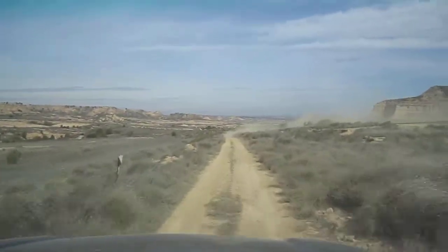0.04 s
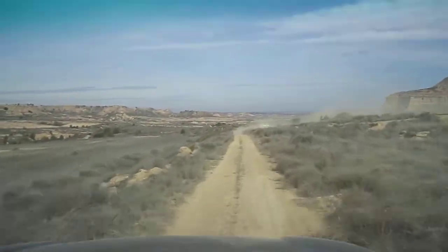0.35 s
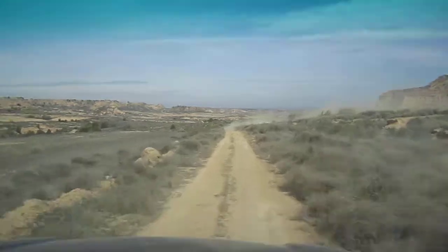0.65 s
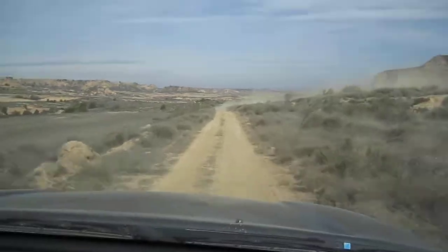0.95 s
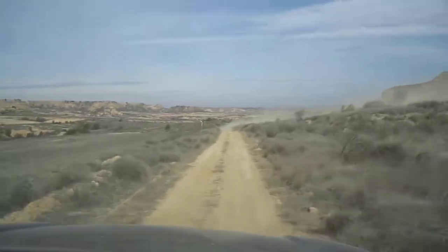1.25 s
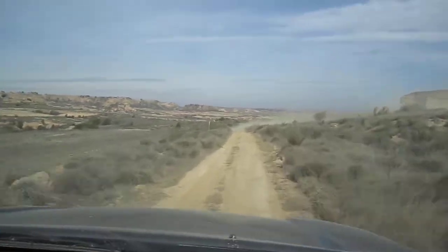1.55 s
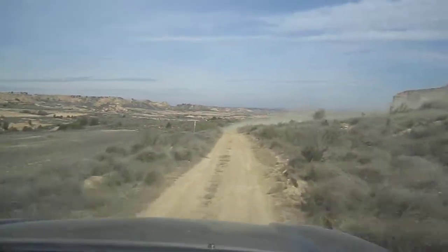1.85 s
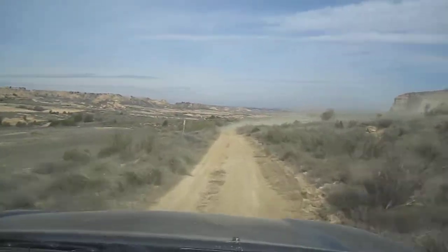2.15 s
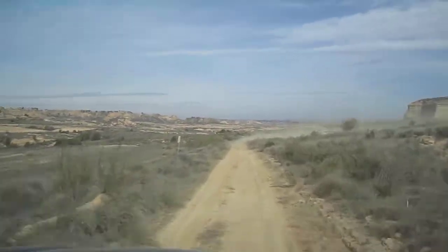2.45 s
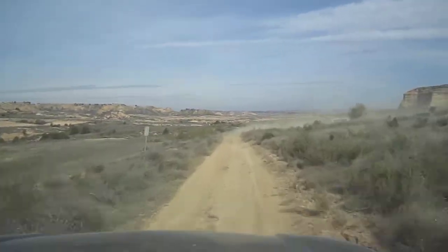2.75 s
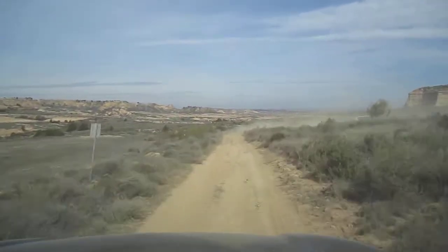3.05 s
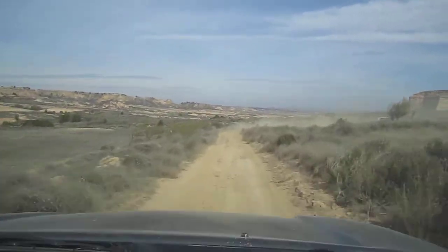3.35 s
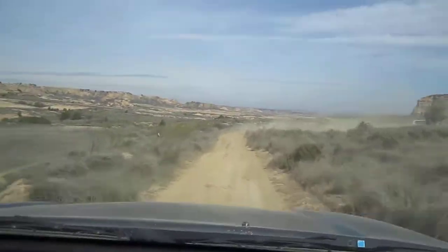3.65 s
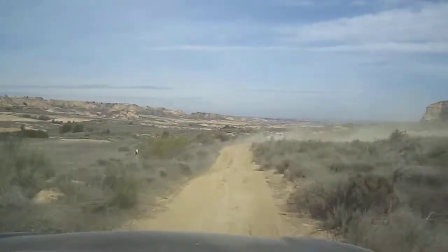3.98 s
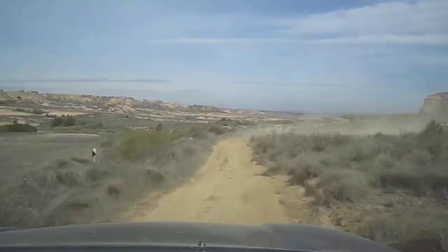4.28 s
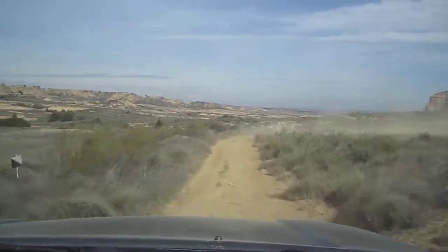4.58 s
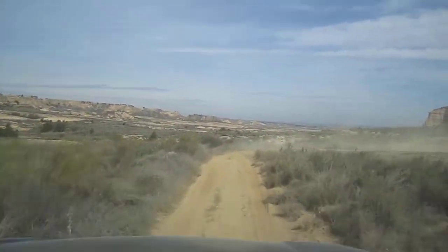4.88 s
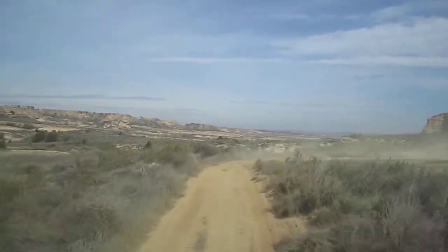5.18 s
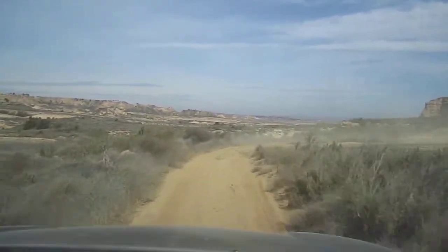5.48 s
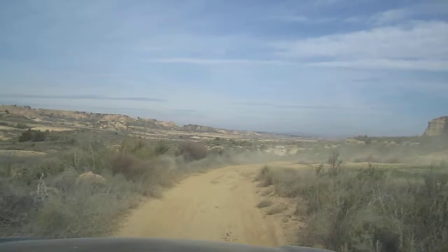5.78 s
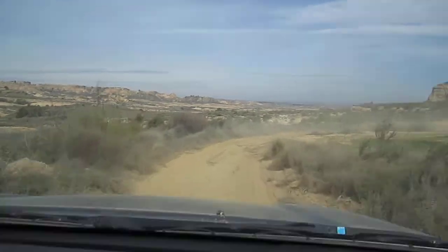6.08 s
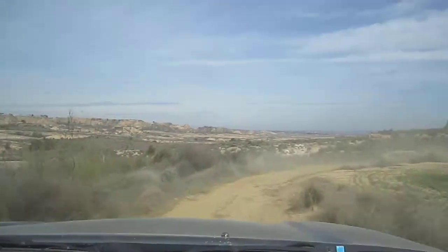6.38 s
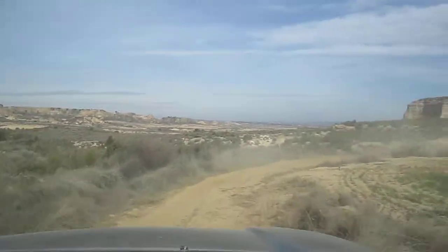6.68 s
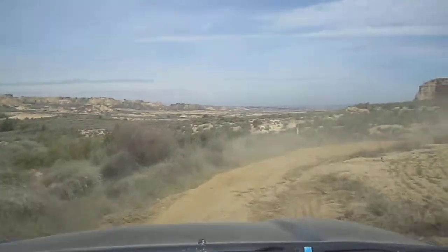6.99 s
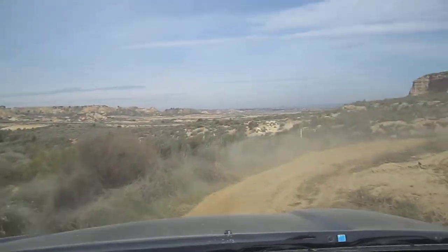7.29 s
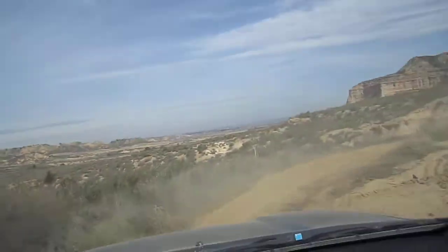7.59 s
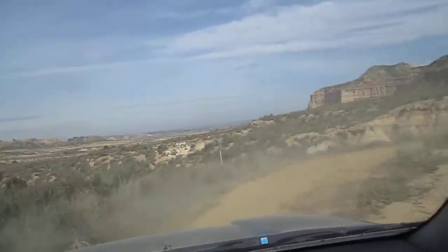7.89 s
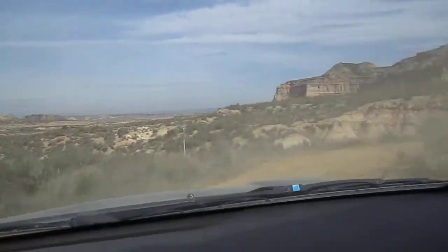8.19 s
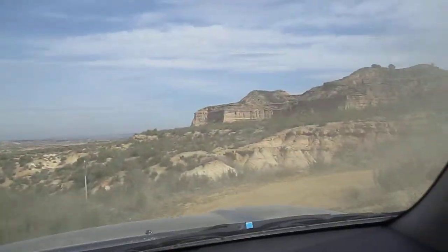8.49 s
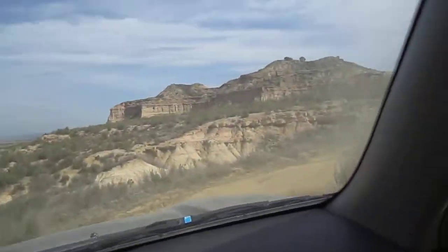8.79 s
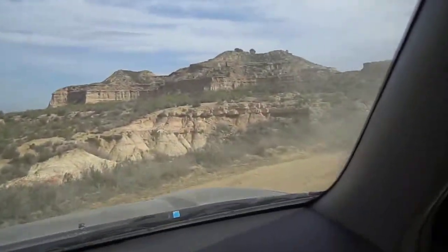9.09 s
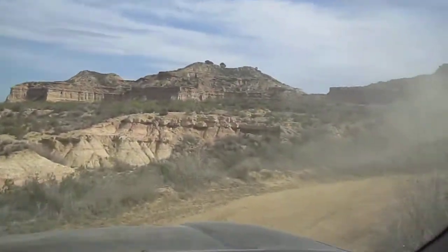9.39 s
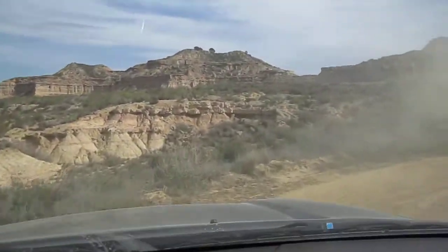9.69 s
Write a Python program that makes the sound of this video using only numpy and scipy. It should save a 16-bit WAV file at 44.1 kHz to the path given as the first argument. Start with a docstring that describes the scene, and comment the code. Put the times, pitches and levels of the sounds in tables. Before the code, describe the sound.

Deep, uneven rumble and tyre noise fill the cabin of a vehicle on a dirt track. After an early bump with thuds and clacks, hollow knocks and rattles come in clusters, joined by light grit ticks as the ground turns stony. The last few seconds are the roughest, with repeated suspension thuds and microphone pops, the level dipping after the biggest hits. The windscreen microphone adds a faint high whine and hiss.

```python
"""Body rumble, suspension judder and tyre roar fill the cabin of a four-wheel-drive on a dirt track.
The small windscreen camera that hears it whines and hisses underneath. Grit ticks, the loose mount
knocks against its stop, and plastic edges clack. Hard jolts thud and pop in the microphone.
The track turns stony; later the roar steps up slightly. Gain control ducks after each overload."""
import sys
import numpy as np
from scipy import signal
from scipy.fft import rfft, irfft
from scipy.io import wavfile
from scipy.ndimage import uniform_filter1d

SR = 44100
rng = np.random.default_rng(int(sys.argv[2]) if len(sys.argv) > 2 else 0)


def waveform_to_disk(signal):
    """Save audio, clipped to [-1, 1], as 16-bit WAV at the path in sys.argv[1]."""
    frames = np.transpose(np.atleast_2d(signal))
    scaled = np.clip(frames, -1, 1) * 32767
    samples = np.round(scaled).astype(np.int16)
    wavfile.write(sys.argv[1], SR, samples)


N = 429534
TIME_S = np.arange(N) / SR
RING_S = np.arange(SR // 6) / SR  # time axis of one impact
STONES_FROM_S, ROAR_RISE_FROM_S = 3.9, 7.3

# ground roughness, highest near the end (time [s], shaking [dB])
ROUGHNESS = [(0, -1.5), (.45, 4.5), (.8, 3.5), (1.25, 2), (1.75, 0.5), (2.3, 2), (2.7, -1.5), (3.55, 2.5),
             (4.65, -5), (5.25, -0.5), (6.1, 3), (6.85, -3.5), (7.2, 0.5), (7.45, 4), (8.05, 6),
             (8.45, 2.5), (9.05, 8.5), (9.74, 6.5)]
# noise spectra (frequency [Hz], relative level [dB])
RUMBLE_SPECTRUM = [(5, -2.5), (11, 1), (30, -5), (55, -12), (80, -19), (110, -30), (200, -45), (400, -87),
                   (3000, -120)]
JUDDER_SPECTRUM = [(60, -23), (105, 3.5), (160, -5.5), (240, -10.5), (320, -17.5), (410, -14), (510, -16.5),
                   (620, -28.5), (1000, -26), (6000, -93)]
TYRE_SPECTRUM = [(200, -3.5), (420, 0), (520, -2), (650, -2.5), (900, -8.5), (1070, -0.5), (1300, -7),
                 (1480, -10.5), (1700, -15), (2600, -20.5), (3150, -21.5), (4000, -25), (7000, -29),
                 (16000, -39)]
HISS_SPECTRUM = [(300, 4.5), (3000, 2.5), (5000, 1), (7500, -1), (10000, -3.5), (13000, -7.5), (16000, -27)]
CLICK_SPECTRUM = [(600, -6), (1500, 0), (3200, 2), (6000, -5.5), (9000, -8.5), (13000, -17.5), (16000, -43)]
CRACK_SPECTRUM = [(700, 1.5), (1500, 4.5), (2000, -0.5), (2700, -5.5), (3100, -8.5), (3700, -21.5),
                  (4500, -17.5), (6000, -25.5), (12000, -47)]
# road-driven housing resonances (frequency [Hz], width [Hz], relative level [dB])
HOUSING_BANDS = [(806.8, 32, -2.5), (1563, 89, -16.5)]
# clearest grit ticks (time [s], level [dB])
GRIT_TICKS = [(0.1, -59), (0.709, -54), (2.898, -54.5), (6.0025, -54), (7.0374, -60), (7.1822, -53),
              (7.3141, -56), (7.4675, -49)]
# struck modes of mount and housing (frequency [Hz], relative level [dB], free t60 [s])
MOUNT_SHELL_MODES = [(485, 7.5, 0.086), (636, -5, 0.048), (707, 7, 0.035), (1010, -37.5, 0.015),
                     (981, 5.5, 0.036), (1189, -1.5, 0.052), (1436, -1, 0.025), (2456, -29, 0.098)]
MOUNT_BODY_MODES = [(362.5, 12, 0.014), (377, -21, 0.012), (407, -7, 0.14)]
CAMERA_HOUSING_MODES = [(750, -13, 0.11), (811, 1, 0.047)]
# loud mount knocks (time [s], shell level [dB], body level [dB re shell], hardness [dB])
MOUNT_KNOCKS = [(0.2082, -32, 3, -12), (0.3104, -34.5, -3.5, -9), (0.4032, -42.5, 13.5, -28),
                (0.4465, -32, -12, 9.5), (0.4658, -27, -19, 9.5), (0.507, -26.5, 9.5, -4),
                (0.568, -34.5, -7, -20), (0.595, -36.5, 10, -26), (0.625, -23.5, 4, -12),
                (1.1185, -31.5, -25, -10.5), (1.1581, -29, -1.5, -6), (2.148, -25.5, 4, -12),
                (2.3665, -37, 4.5, -9.5), (3.2755, -27, 5.5, -34), (3.4653, -37, 1, -29),
                (3.528, -45.5, 12.5, -34), (3.7709, -30, 0.5, -16), (3.8644, -32, 5.5, -30),
                (3.9001, -32, 7.5, -9), (3.9666, -36.5, 6, -4), (4.581, -26.5, 6, -14),
                (5.0813, -39, 1, -15), (5.2356, -42.5, 10.5, -41), (5.2879, -29, 1, -13),
                (5.4847, -29.5, -20, -11.5), (5.497, -37.5, 3, -9), (5.5201, -35.5, -7, -22),
                (5.5774, -30, 2.5, -23), (5.6901, -31, 3, -7.5), (5.8901, -27, 4, -15.5),
                (6.4201, -29, 3.5, -10), (6.4733, -36.5, 0, -15.5), (6.4848, -29, 0, -23),
                (6.5806, -31, 0, -13), (6.694, -26.5, 0, -17), (6.7235, -30, 4, -16),
                (6.098, -52, 15.5, -26), (6.966, -44, 7, -21), (7.202, -49.5, 9.5, -17),
                (7.4049, -27.5, 4, -6.5), (7.4134, -37, 9.5, 1), (7.4264, -23.5, -19, -6.5),
                (7.6384, -30, -13, -8.5), (7.671, -37.5, 10, 2.5), (7.9905, -28.5, 6, -4),
                (8.0407, -33, 3, -4), (8.124, -29.5, 3.5, -7), (8.3967, -30.5, 5.5, -8),
                (9.3629, -26.5, 10, -6), (9.4003, -32, 7.5, -15), (9.5154, -26.5, 1.5, -21.5),
                (9.6376, -27, 1, -22)]
# heavy suspension thuds (centre time [s], frequency [Hz], level [dB])
SUSPENSION_THUDS = [(0.404, 23.3, -9), (0.4454, 170, 4.5), (0.4678, 119, 7.5), (7.265, 62, -16),
                    (7.427, 90.5, -7.5), (7.526, 57, -10.5), (7.592, 128, -12), (8.352, 202.4, -14.5),
                    (8.569, 220, -16.5), (8.7371, 310, -17.5), (8.7444, 97, -5), (8.991, 139, -9),
                    (9.01, 50.2, -6.5), (9.169, 75, -5)]
# jolts at the microphone (time [s], pressure step [relative])
MIC_POPS = [(0.4464, -0.6), (0.4667, 2), (0.4922, -1.1), (1.2278, 0.42), (1.2625, 0.76), (6.269, 0.22),
            (7.4954, 1.53), (7.6471, 1.47), (7.6654, 3.5), (8.749, 4), (8.9531, 0.72), (9.0525, 4),
            (9.0589, 4), (9.157, 1.5), (9.1723, 3), (9.6134, 0.76), (9.6882, 3)]
# plastic edge impacts (time [s], level [dB])
EDGE_CLACKS = [(0.4468, -31.5), (0.4684, -43), (.499, -46), (0.5198, -33), (1.158, -44), (7.392, -44),
               (7.4166, -39), (7.425, -25), (7.442, -21.5), (8.909, -54.5)]


def undb(db):
    """Decibels to gain."""
    return 10 ** (np.asarray(db) / 20)


def unit(x):
    """Scale to rms 1."""
    return x / np.sqrt(np.mean(x ** 2))


def unit_energy(x):
    """Scale to the energy of 20 ms at rms 1."""
    return x / np.sqrt(np.sum(x ** 2) / (.02 * SR))


def add(out, start_s, x):
    """Mix x into out from start_s."""
    i = max(int(start_s * SR), 0)
    out[i:i + len(x)] += x[:max(N - i, 0)]


def colour(x, spectrum):
    """Minimum-phase filter from the folded cepstrum of a spectrum table."""
    size = 16384
    hz, db = np.transpose(spectrum)
    bins_hz = np.maximum(np.fft.rfftfreq(size, 1 / SR), 1)
    bins_db = np.interp(np.log(bins_hz), np.log(hz), db)
    cepstrum = irfft(np.log(undb(bins_db)))
    cepstrum[1:size // 2] *= 2
    cepstrum[size // 2 + 1:] = 0
    impulse = irfft(np.exp(rfft(cepstrum)))
    return signal.fftconvolve(x, impulse)[:len(x)]


def lowpass(x, hz):
    """One-pole low-pass."""
    return signal.lfilter(*signal.butter(1, min(hz, SR / 2 - 1), fs=SR), x)


def shaking_db(time_s):
    """How hard the ground shakes the vehicle."""
    return np.interp(time_s, *np.transpose(ROUGHNESS))


def stony_time_s(share):
    """Time at a share (0-1) of the stony stretch."""
    return STONES_FROM_S + share * (N / SR - STONES_FROM_S)


def road_noise(spectrum, flutter_db, flutter_hz):
    """Coloured noise at rms 1, fluttering with the uneven ground."""
    noise = colour(rng.standard_normal(N), spectrum)
    hold = int(SR / flutter_hz)
    steps = np.repeat(rng.standard_normal(N // hold + 1), hold)
    wander = unit(uniform_filter1d(steps, hold)[:N])
    return unit(noise * undb(flutter_db * wander))


def tyre_roar():
    """Tyre noise rings the camera housing; both step up slightly from 7.3 s."""
    roar = undb(1) * road_noise(TYRE_SPECTRUM, flutter_db=.6, flutter_hz=25)
    for hz, width_hz, db in HOUSING_BANDS:
        b, a = signal.iirpeak(hz, hz / width_hz / 1.48, fs=SR)  # widened for two passes
        band = signal.lfilter(b, a, rng.standard_normal(N))
        roar += undb(db) * unit(signal.lfilter(b, a, band))
    roar_rise_db = 2.5 * np.clip((TIME_S - ROAR_RISE_FROM_S) / .09, 0, 1)
    return undb(-50 + .083 * shaking_db(TIME_S) + roar_rise_db) * roar


def body_shake():
    """Rough ground makes the body rumble and the suspension judder."""
    rumble = undb(-24.5) * road_noise(RUMBLE_SPECTRUM, flutter_db=2.35, flutter_hz=4.5)
    judder = undb(-42) * road_noise(JUDDER_SPECTRUM, flutter_db=3, flutter_hz=22)
    return undb(shaking_db(TIME_S)) * (rumble + judder)


def electronics(whine_hz=7867, rise_hz=60, frame_hz=30):
    """Camera whine, higher in the pause after each frame, plus preamplifier hiss."""
    pause = (TIME_S * frame_hz + rng.random()) % 1 < .25
    phase = 2 * np.pi * np.cumsum(whine_hz + rise_hz * pause) / SR
    whine = undb(-64) * np.sqrt(2) * np.sin(phase)
    hiss = undb(-66) * unit(colour(rng.standard_normal(N), HISS_SPECTRUM))
    return whine + hiss


def burst(t60_s):
    """Decaying contact noise."""
    return rng.standard_normal(len(RING_S)) * np.exp(-np.log(1000) * RING_S / t60_s)


def click(db, t60_s):
    """Two hard edges meet."""
    return undb(db) * unit_energy(colour(burst(t60_s), CLICK_SPECTRUM))


def grit(t60_s=.00067):
    """Sharp ticks of grit, with faint ones scattered over the stony stretch."""
    out = np.zeros(N)
    for time_s, db in GRIT_TICKS:
        add(out, time_s, click(db, t60_s))
    for share, size in rng.random(size=(24, 2)):
        add(out, stony_time_s(share), click(-61.5 + 5 * size ** 2, t60_s))
    return out


def ring(modes, scatter_db, detune):
    """Struck modes; each blow lands on a slightly different spot."""
    hz, db, t60_s = np.transpose(modes)[:, :, None]
    size, shift = rng.standard_normal((2, len(modes), 1))
    waves = np.sin(2 * np.pi * hz * (1 + detune * shift) * RING_S)
    decay = undb(-60 * RING_S / t60_s)
    return np.sum(undb(db + scatter_db * size) * waves * decay, axis=0)


def knock(db, body_db, hardness_db, grip_s=.069):
    """The mount hits its stop: ringing shell and housing, hollow body note, short crack."""
    contact_hz = 1500 * undb(.37 * (hardness_db + 15))  # soft blows push longer and miss upper modes
    grip = np.exp(-RING_S / grip_s)  # the stop damps the mount
    shell = grip * ring(MOUNT_SHELL_MODES, scatter_db=4.5, detune=.05)
    shell = unit_energy(lowpass(lowpass(shell, contact_hz), contact_hz))
    body = unit_energy(grip * ring(MOUNT_BODY_MODES, scatter_db=2, detune=.015))
    housing = unit_energy(ring(CAMERA_HOUSING_MODES, scatter_db=2, detune=.006))
    crack = colour(burst(t60_s=.011) + undb(-15) * burst(t60_s=.06), CRACK_SPECTRUM)
    crack = unit_energy(lowpass(crack, 3 * contact_hz))
    return undb(db) * (shell - undb(body_db) * body + undb(-3.5) * housing + undb(hardness_db + 3) * crack)


def mount_rattle(mean_rebound_s=.006, rebound_db=-15.5):
    """Loud knocks, each with one softer rebound; faint chatter on the stony stretch."""
    out = np.zeros(N)
    for time_s, db, body_db, hardness_db in MOUNT_KNOCKS:
        add(out, time_s, knock(db, body_db, hardness_db))
        delay_s = mean_rebound_s * (.5 + rng.random())
        add(out, time_s + delay_s, knock(db + rebound_db, body_db, hardness_db))
    for share, size, tone in rng.random(size=(44, 3)):
        time_s = stony_time_s(share)
        db = -56 + 10 * size ** 2 + .29 * shaking_db(time_s)
        add(out, time_s, knock(db, body_db=5 + 7.5 * tone, hardness_db=-38))
    return out


def thud(hz, db):
    """One push and its rebound, centred in RING_S."""
    cycles = (RING_S - RING_S[-1] / 2) * hz
    envelope = np.exp(-((cycles - .2) / .5) ** 2)
    return undb(db) * np.cos(2 * np.pi * cycles) * envelope


def thuds(stone_min_hz=77.7, stone_octaves=1.7):
    """Heavy shocks through the suspension; light ones from stones under the tyres."""
    out = np.zeros(N)
    for centre_s, hz, db in SUSPENSION_THUDS:
        add(out, centre_s - RING_S[-1] / 2, thud(hz, db))
    for share, pitch in rng.random(size=(14, 2)):
        time_s = stony_time_s(share)
        hz = stone_min_hz * 2 ** (stone_octaves * pitch)
        add(out, time_s, thud(hz, db=-28.5 + shaking_db(time_s)))
    return out


def pops():
    """Jolts reach the microphone as pressure steps that leak away."""
    out = np.zeros(N)
    leak = np.exp(-RING_S / .0033) - .6 * np.exp(-RING_S / .0051)
    pop = .98 * lowpass(leak, hz=1900) + .33 * leak  # rounded step plus some sharp edge
    for time_s, step in MIC_POPS:
        add(out, time_s, step * pop)
    return out


def clacks():
    """Hard plastic edges collide on the worst bumps."""
    out = np.zeros(N)
    for time_s, db in EDGE_CLACKS:
        add(out, time_s, click(db, t60_s=.014))
    return out


def scene():
    """Mono sum of all sources."""
    road = tyre_roar() + body_shake()
    rattles = mount_rattle() + clacks() + grit()
    return (road + rattles + thuds() + pops() + electronics())[None]


def gain_control(x, threshold, depth, release_s, attack_hz):
    """Peaks over the threshold pull the gain down within milliseconds; it creeps back."""
    excess = depth * np.maximum(np.abs(x) - threshold, 0)
    fade = np.exp(-TIME_S / release_s)
    held = np.maximum.accumulate(excess / fade) * fade
    return x / (1 + lowpass(held, attack_hz))


def record(dry):
    """Gain control, converter overload, steep treble cut."""
    ducked = gain_control(dry[0], threshold=.73, depth=3.07, release_s=.37, attack_hz=37)
    clipped = np.clip(ducked, -.72, .72)
    cutoff_hz = 16300
    treble_cut = signal.ellip(8, .2, 70, cutoff_hz, fs=SR, output="sos")
    return signal.sosfilt(treble_cut, clipped)[None]


dry = scene()
out = record(dry)
waveform_to_disk(out)
```